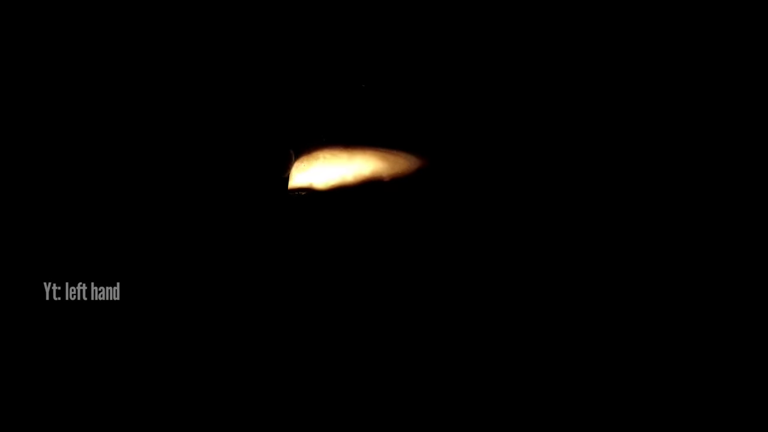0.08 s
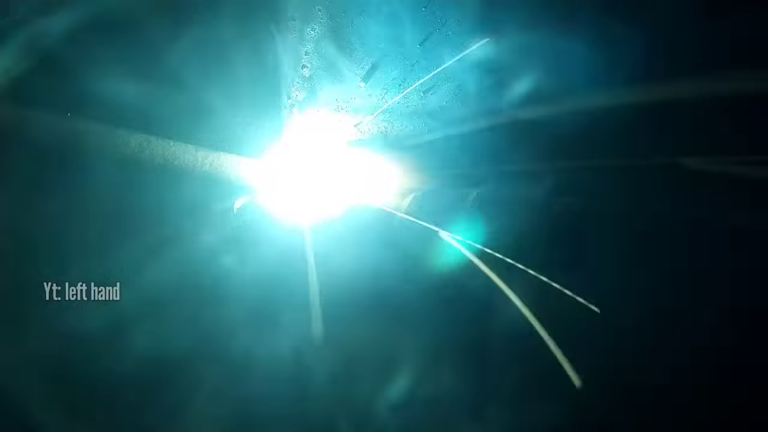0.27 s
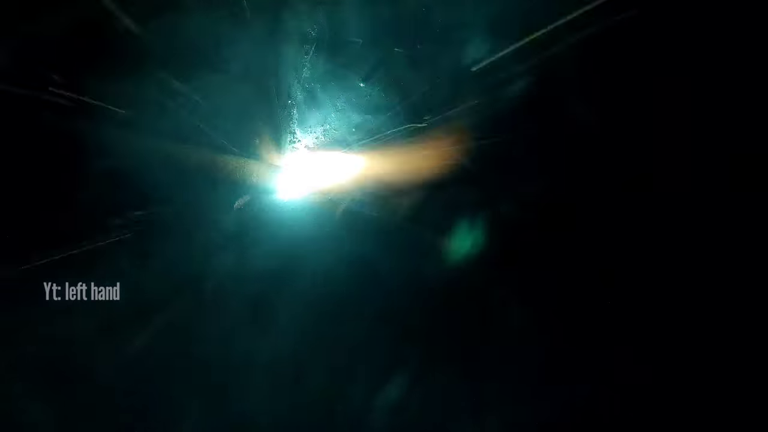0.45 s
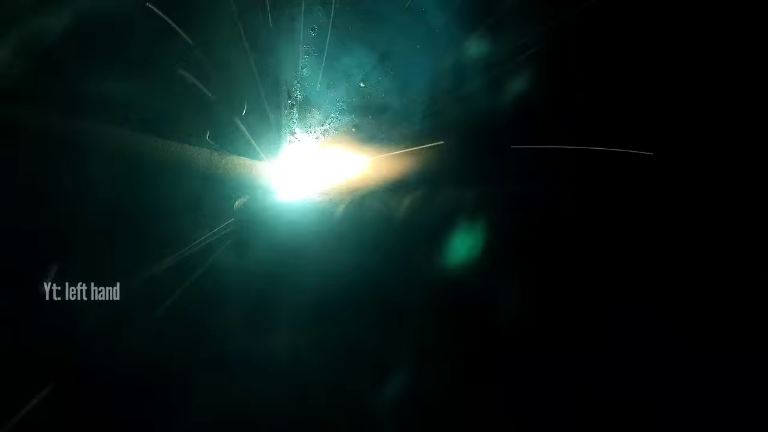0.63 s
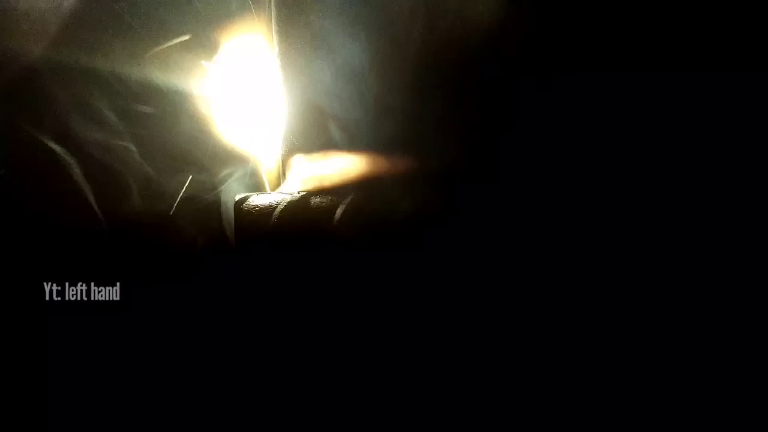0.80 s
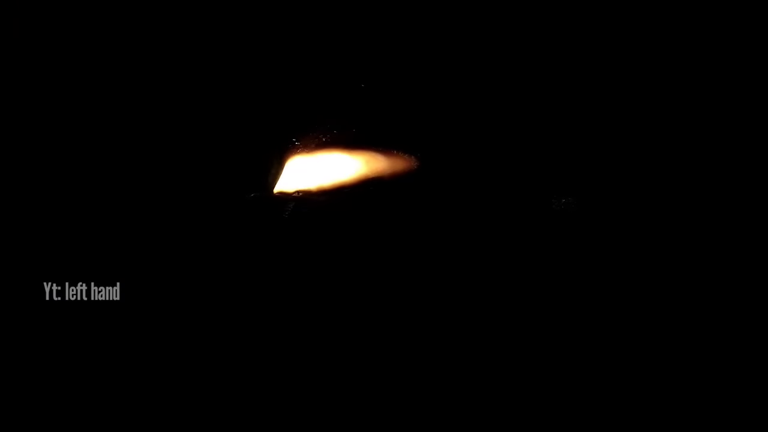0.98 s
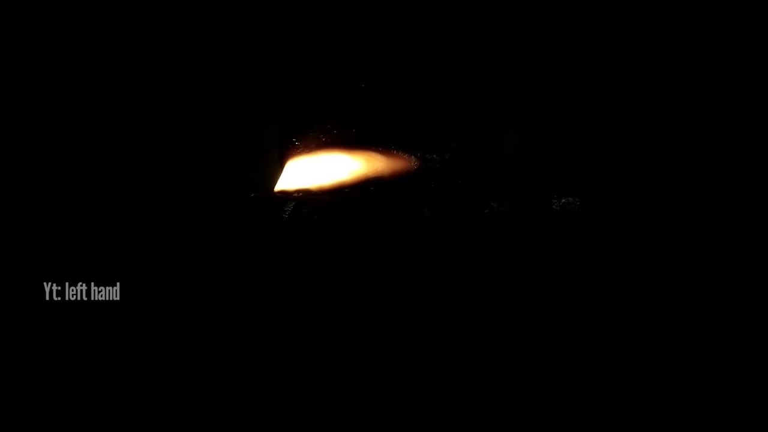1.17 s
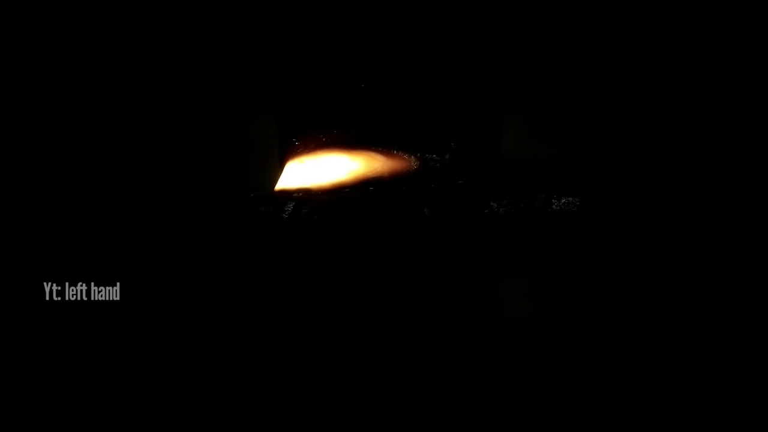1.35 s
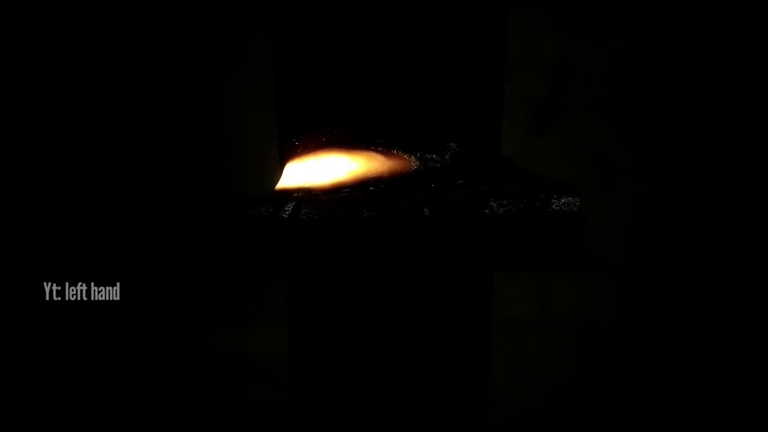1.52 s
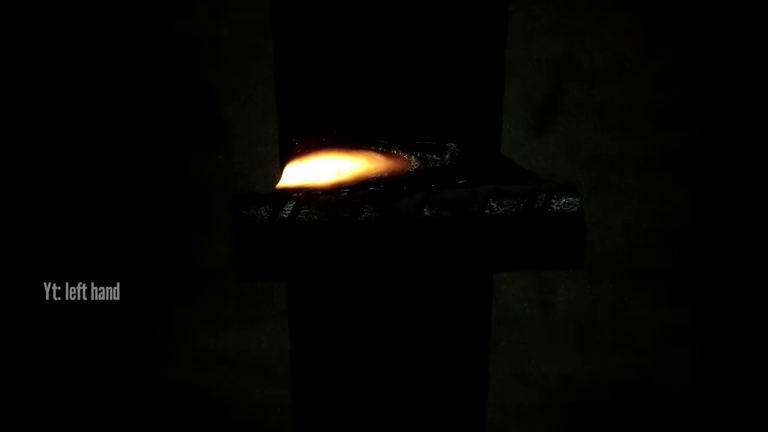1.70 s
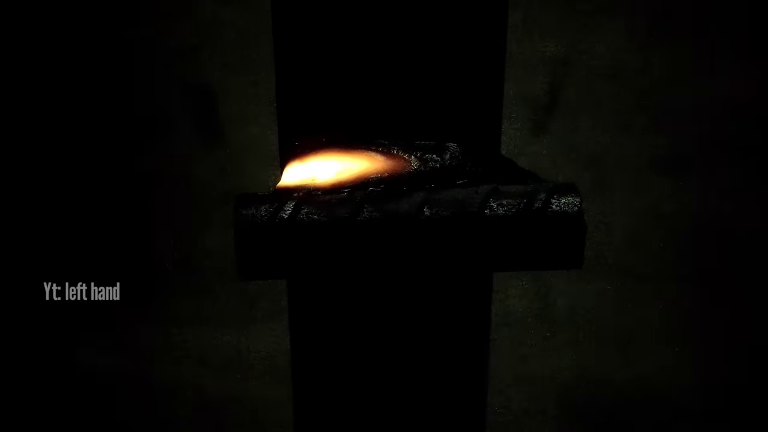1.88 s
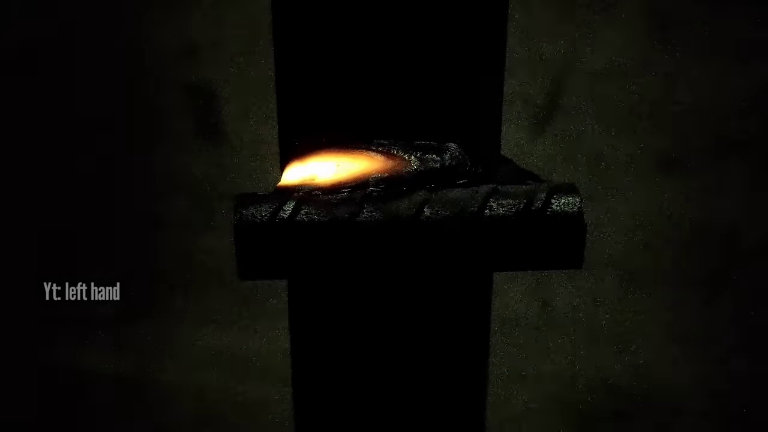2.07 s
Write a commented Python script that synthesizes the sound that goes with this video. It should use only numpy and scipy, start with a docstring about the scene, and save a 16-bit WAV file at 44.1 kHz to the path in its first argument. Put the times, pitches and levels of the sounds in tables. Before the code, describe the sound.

A welding arc strikes abruptly close to the microphones, sizzling and cracking sharply with low air thumps on the right, then cuts out into a brief soft hiss, a small hollow knock and faint ticks over workshop hum.

```python
"""From the start a transformer hum wavers (a drifting sine), a fan whines with its octave, and a far rumble
and room noise lie beneath (filtered noise). Then a welding arc strikes, sizzling, spitting and cracking for
two thirds of a second: noise bursts and spikes, brighter on the left, with pressure jolts and a flutter of air
thumping the right microphone, and a short workshop echo. As it goes out the hot weld hisses smoothly; later
come a puff with a metallic tick, a small hollow knock of decaying modes in rattling noise, and more ticks."""
import sys
import numpy as np
from scipy import signal
from scipy.fft import rfft, irfft
from scipy.io import wavfile
from scipy.ndimage import uniform_filter1d

SR = 44100
rng = np.random.default_rng(int(sys.argv[2]) if len(sys.argv) > 2 else 0)


def wav_record(signal):
    """Record a signal, one row per channel, as 16-bit PCM in the file named by sys.argv[1]."""
    frames = np.transpose(np.atleast_2d(signal))
    bounded = np.clip(frames, -1, 1)
    # unit amplitude maps onto the largest positive 16-bit level
    quanta = np.round(bounded * 32767).astype(np.int16)
    wavfile.write(sys.argv[1], SR, quanta)


def how_loud(loudness_db):
    """Turn decibels into a plain amplitude multiplier (0 dB gives 1, 20 dB gives 10)."""
    steps = np.asarray(loudness_db, float) / 20
    return 10 ** steps


N = 94815
t = np.arange(N) / SR

# Spectrum of the room noise. Each row: frequency in Hz, relative level in dB.
ROOM_COLOUR = [(40, -26), (70, -1), (130, -2.5), (250, -8), (400, -9), (470, -2), (750, -6.5), (880, -16),
               (1000, -17.5), (1200, -19), (2000, -15.5), (2800, -24.5), (4000, -27.5), (5500, -35.5),
               (7000, -30.5), (8500, -44), (16000, -56.5)]
# Level of the room noise. Each row: time in seconds, level in dB.
ROOM_LEVEL = [(0, -47.5), (.23, -50), (.9, -51), (1.0, -45), (1.1, -48.5), (1.4, -51), (1.55, -51),
              (1.8, -50), (2.15, -50)]
# Wavering level of the transformer hum. Each row: time in seconds, rms level in dB.
HUM_LEVEL = [(0.0, -59.5), (0.15, -54), (0.27, -56), (0.62, -67), (0.77, -74), (0.9, -49.5), (0.99, -76),
             (1.17, -57), (1.51, -61), (1.64, -48.5), (1.71, -46.5), (1.86, -63), (2.15, -75)]
# Level of the far rumble. Each row: time in seconds, level in dB.
RUMBLE_LEVEL = [(0, -69.5), (1.6, -83), (1.8, -63.5), (2.1, -61.5), (2.125, -66), (2.14, -44), (2.15, -59)]
# Spectrum of the rumble. Each row: frequency in Hz, relative level in dB.
RUMBLE_COLOUR = [(25, -44.5), (45, 20.5), (75, 5), (150, 6), (300, -31.5)]
# Level of the arc's sizzle before each microphone's colour. Each row: time in seconds, level in dB.
SIZZLE_LEVEL = [(.238, -87), (.241, -32.5), (.29, -32.5), (.305, -37.5), (.312, -35), (.33, -30),
                (.338, -46), (.342, -38), (.39, -43.5), (.402, -40.5), (.43, -32.5), (.445, -44),
                (.456, -29), (.505, -44.5), (.511, -27), (.56, -31.5), (.585, -30.5), (.592, -29.5),
                (.635, -24.5), (.665, -33.5), (.674, -24.5), (.677, -46), (.685, -33.5), (.72, -33.5),
                (.735, -27.5), (.76, -36.5), (.785, -36), (.825, -36), (.83, -28), (.852, -25),
                (.862, -32.5), (.897, -43.5), (.901, -34), (.906, -28.5), (.911, -37), (.918, -31),
                (.926, -53), (.97, -74.5)]
# Colour of the arc at the left microphone. Each row: frequency in Hz, relative level in dB.
ARC_LEFT_COLOUR = [(100, -31), (500, -12.5), (1500, -11.5), (3300, -5), (5600, -9), (6700, -3), (8300, -7),
                   (8900, -5), (11800, -4.5), (14000, 0.5), (15200, -5.5), (16200, 1)]
# Colour of the arc at the right microphone. Each row: frequency in Hz, relative level in dB.
ARC_RIGHT_COLOUR = [(100, -19), (500, -20), (2000, -12), (2900, -7), (4200, -12), (5600, -11), (6500, -2.5),
                    (8300, -15.5), (8900, -5.5), (11900, -28), (14700, -3), (16200, -27)]
# Loud cracks of the arc. Each row: time at the left microphone in seconds, reference level in dB,
# lean to the left in dB.
CRACKS = [(.2602, -22, 5), (.3146, -16, 4), (.3193, -18, 3), (.3238, -10, 7), (.3345, -11, 8),
          (.3522, -24, 2), (.3813, -21, 4), (.3823, -13, 5), (.41, -22, 6), (.4549, -9, 2), (.5088, -21, 2),
          (.5139, -10, 6), (.5326, -16, 13), (.5462, -12, 13), (.5615, -16, 11), (.5722, -16, 8),
          (.5941, -14, 2), (.5995, -9, 2), (.6099, -18, 7), (.6267, -16, 9), (.63, -18, 3), (.6339, -11, 3),
          (.6366, -11, 4), (.6382, -12, 4), (.6475, -16, 7), (.6642, -13, 8), (.6648, -3, 11),
          (.6658, -12, 8), (.6842, -5, 9), (.73, -15, 3), (.7391, -19, 3), (.7439, -10, 6), (.7528, -13, 6),
          (.8296, -8, 12), (.8344, -18, 9), (.8405, -9, 16), (.8474, -15, 12), (.849, -1.5, 15),
          (.8535, -17, 18), (.9006, -21, 4), (.9053, -25, 2), (.9168, -26, 2)]
# Late puffs of the cooling weld. Each row: start in seconds, level in dB, decay in seconds.
PUFFS = [(1.2945, -40.5, 0.019)]
# Level of the low flutter of air. Each row: time in seconds, level in dB.
FLUTTER_LEVEL = [(.238, -65), (.245, -28), (.295, -28.5), (.31, -42), (.35, -31), (.39, -52), (.4, -67),
                 (.5, -63), (.515, -43), (.55, -61), (.58, -54), (.6, -37), (.63, -52), (.69, -37.5),
                 (.72, -42.5), (.77, -38), (.82, -44), (.87, -46), (.9, -35), (.92, -42.5), (.93, -70)]
# Spectrum of the flutter. Each row: frequency in Hz, relative level in dB.
FLUTTER_COLOUR = [(50, -37.5), (90, 6.5), (250, -3.5), (600, -14.5), (1500, -18.5), (5000, -43.5)]
# Pressure jolts on the right microphone. Each row: start in seconds, level in dB, sign of the push.
RIGHT_JOLTS = [(.2393, -17, -1), (.2417, -18, 1), (.2434, -18, 1), (.2463, -14, -1), (.2625, -14, -1),
               (.2631, -14, 1), (.3239, -7, -1), (.3245, -6.5, 1), (.3343, -8, -1), (.3348, -7.5, 1),
               (.3524, -19, -1), (.3529, -16, 1), (.3536, -19, -1), (.3811, -6, -1), (.3816, -17, 1),
               (.38215, -10, 1), (.3823, -8, -1), (.3826, -8, 1), (.4548, -12, 1), (.594, -10, 1),
               (.603, -24, -1), (.6646, -13, 1), (.6739, -20, -1), (.6839, -10, 1), (.7437, -7, 1),
               (.7525, -7, -1), (.8011, -22, 1), (.8488, -6, 1), (.8554, -24, -1)]
# The one jolt that lands on the left. The row: start in seconds, level in dB, sign of the push.
LEFT_JOLT = (.3522, -16, -1)
# Level of the hot weld's smooth hiss. Each row: time in seconds, level in dB.
AFTER_HISS_LEVEL = [(.915, -68), (.93, -51.5), (.97, -54.5), (1.0, -51.5), (1.06, -54.5), (1.12, -57.5),
                    (1.14, -72), (1.25, -81)]
# Spectrum of that hiss. Each row: frequency in Hz, relative level in dB.
AFTER_HISS_COLOUR = [(1000, -24), (3000, -1), (7000, -1), (9500, -10.5), (12500, -5.5), (14500, -0.5),
                     (16000, -3.5)]
# Small metallic ticks. Each row: start in seconds, level in dB, decay in seconds, two ring pitches in Hz.
TICKS = [(1.2945, -57, .012, 4900, 6500), (1.661, -60, 0.012, 2300, 3300), (2.009, -53, 0.006, 2350, 3400),
         (2.1245, -58, 0.004, 7250, 10400), (2.1365, -49, 0.006, 2500, 3450)]
# Spectrum of the ticks' noise. Each row: frequency in Hz, relative level in dB.
TICK_COLOUR = [(300, -25), (2000, -4), (3500, 0), (5500, -7), (7000, -4), (8500, -14), (11000, -11),
               (16000, -24)]
# Level of the knock's rattling body. Each row: time in seconds, level in dB.
RATTLE_LEVEL = [(1.654, -90), (1.659, -42), (1.674, -41), (1.7, -50), (1.73, -51.5), (1.78, -68.5),
                (1.8, -100)]
# Spectrum of the rattle. Each row: frequency in Hz, relative level in dB.
RATTLE_COLOUR = [(300, -30), (600, -0.5), (800, -0.5), (1100, -2), (1500, -6.5), (2200, -21.5),
                 (4000, -23.5), (9000, -38.5)]
# Blows of the small knock. Each row: start in seconds, level in dB.
KNOCKS = [(1.662, -38), (1.672, -28.5), (1.684, -40)]
# Modes of the knocked object. Each row: frequency in Hz, level against the blow in dB, T60 in seconds.
KNOCK_MODES = [(622, -14.5, 0.13), (773, 0.5, 0.06), (820, -9, 0.047), (1090, -7.5, 0.016),
               (1380, -18, 0.09), (1690, -25, 0.042), (2290, -22.5, 0.047), (3330, -41, 0.074)]

HUM_HZ, HUM_WOBBLE = 100.7, 0.027  # wobble as a fraction of the pitch
WHINE_HZ, WHINE_WIDTH_HZ = 485, 2.5
WHINE_DB, WHINE_OCTAVE_DB, WHINE_FLICKER_DB = -56.5, -14, 1.2
WHINE_PAN_DB = 8  # left over right; the octave leans the other way
LEFT_LAG_S = 0.00015  # the arc reaches the left microphone later
ARC_RIGHT_DB = -6.5
SHARED = .5  # power share of the arc noise common to both microphones
SPUTTER_DB = 2.5  # quick unevenness of the sizzle
SPITS_PER_S, SPIT_S = 450, .00025
SPIT_DB, SPIT_SPREAD_DB, SPIT_TOP_DB = 4, 6, 16  # against the steady sizzle
CRACK_S, CRACK_TAIL_S = .00002, .0011  # decay of the spike and of its hissing tail
SPIKE_DB, TAIL_DB = 8, -14  # against the crack's reference level
RING_HZ, RING_S, RING_DB = 13900, .00028, -1
RING_FULL_DB = 12  # left lean at which a crack's ring is full
ECHO_T60_S, ECHO_DB, ECHO_GAP_S, ECHO_TOP_HZ = 0.22, -18, 0.0013, 8500
JOLT_RISE_S, JOLT_LEAK_DB = .000045, -27
MIC_CUT_HZ, MIC_CUT_DAMP = 99, 2.94
AFTER_RIGHT_DB = 1.5  # right over left
KNOCK_PUSH_S = 0.0012  # softness of the blow


def curve(rows):
    """Gain over time from (s, dB) rows."""
    return how_loud(np.interp(t, *np.array(rows, float).T))


def unit(x):
    """Scale to rms 1."""
    return x / np.sqrt(np.mean(x ** 2))


def colour(x, rows):
    """Minimum-phase filter shaped by (Hz, dB) rows; white noise keeps its level."""
    size = 4096
    hz, db = np.array(rows, float).T
    bins_hz = np.arange(size // 2 + 1) * SR / size
    gain_db = np.interp(np.log(bins_hz + 1), np.log(hz), db)
    # folding the cepstrum forward in time makes the filter causal
    cepstrum = irfft(np.log(how_loud(gain_db)))
    cepstrum[1:size // 2] *= 2
    cepstrum[size // 2 + 1:] = 0
    impulse = irfft(np.exp(rfft(cepstrum)))
    return signal.fftconvolve(x, impulse / np.sqrt(np.sum(impulse ** 2)))[:N]


def fade(times, sizes, decay_s):
    """Jumps at the given times that die away exponentially."""
    x = np.zeros(N)
    np.add.at(x, np.clip((np.asarray(times) * SR).astype(int), 0, N - 1), sizes)
    return signal.lfilter([1], [1, -np.exp(-1 / (decay_s * SR))], x)


def walk(rate):
    """Slow random drift of rms 1, with fresh targets at the given rate in Hz."""
    hold = int(SR / rate)
    steps = np.repeat(rng.standard_normal(N // hold + 1), hold)
    smooth = uniform_filter1d(uniform_filter1d(steps, hold), hold)
    return unit(smooth[:N])


def room():
    """Room noise, alike left and right in the bass because the side signal is high-passed."""
    mid, side = (colour(rng.standard_normal(N), ROOM_COLOUR) for _ in range(2))
    side = signal.lfilter(*signal.butter(2, 296, "high", fs=SR), side)
    return curve(ROOM_LEVEL) * np.array([mid + side, mid - side]) / np.sqrt(2)


def transformer_hum():
    """One sine whose pitch drifts at random and whose level wavers."""
    pitch_hz = HUM_HZ * (1 + HUM_WOBBLE * walk(8.4))
    return np.sqrt(2) * curve(HUM_LEVEL) * np.sin(2 * np.pi * np.cumsum(pitch_hz) / SR)


def fan_whine():
    """A thin sine and its octave, slightly unsteady in pitch and level, leaning to opposite sides."""
    phase = 2 * np.pi * np.cumsum(WHINE_HZ + WHINE_WIDTH_HZ / 2 * walk(14)) / SR
    pan = how_loud(np.array([[1], [-1]]) * WHINE_PAN_DB / 2)
    tone = pan * np.sin(phase) + how_loud(WHINE_OCTAVE_DB) * np.sin(2 * phase) / pan
    return tone * how_loud(WHINE_DB + WHINE_FLICKER_DB * walk(31.0))


def rumble():
    """Far low noise, the same on both sides."""
    return curve(RUMBLE_LEVEL) * colour(rng.standard_normal(N), RUMBLE_COLOUR)


def sputtering_sizzle():
    """Envelope of the burning arc: an uneven level covered with small random spits."""
    gap, size = rng.exponential(size=(4000, 2)).T
    when = np.cumsum(gap) / SPITS_PER_S
    spit_db = np.minimum(SPIT_DB + SPIT_SPREAD_DB * (size - 1), SPIT_TOP_DB)
    spits = 1 + fade(when, how_loud(spit_db) * (when < N / SR), SPIT_S)
    return curve(SIZZLE_LEVEL) * unit(spits * how_loud(SPUTTER_DB * walk(150)))


def arc():
    """Partly shared noise under sizzle, crack tails and puffs, plus spikes; left-leaning cracks ring."""
    body = sputtering_sizzle() + sum(fade([s], how_loud(db), decay) for s, db, decay in PUFFS)
    at, db, pan_db = np.array(CRACKS).T
    at = at - LEFT_LAG_S
    sign = np.sign(rng.standard_normal(len(at)))
    lean = np.clip(pan_db / RING_FULL_DB, 0, 1)
    kicks = fade(at, sign * how_loud(db + RING_DB) * lean, CRACK_S)
    pole = np.exp(2j * np.pi * RING_HZ / SR - 1 / (RING_S * SR))
    ring = signal.lfilter([1], [1, -pole], kicks).real
    common = rng.standard_normal(N)
    ears = []
    for rows, lower_db in ((ARC_LEFT_COLOUR, 0 * pan_db), (ARC_RIGHT_COLOUR, pan_db - 6.0)):
        noise = np.sqrt(SHARED) * common + np.sqrt(1 - SHARED) * rng.standard_normal(N)
        peak = how_loud(db - lower_db)
        tails = fade(at, peak * how_loud(TAIL_DB), CRACK_TAIL_S)
        # a ringing crack has a weaker spike
        spikes = fade(at, sign * peak * how_loud(SPIKE_DB) * (1 - lean / 2), CRACK_S)
        ears.append(colour(noise * (body + tails) + spikes, rows))
    left = np.roll(ears[0] + ring, round(LEFT_LAG_S * SR))
    return np.array([left, how_loud(ARC_RIGHT_DB) * ears[1]])


def workshop_echo(x):
    """Adds a decaying, dulled cloud of random echoes to each channel."""
    age = t[:SR] - ECHO_GAP_S
    tail = rng.standard_normal((2, SR)) * (age > 0) * np.exp(-np.log(1000) * age / ECHO_T60_S)
    tail = signal.lfilter(*signal.butter(1, ECHO_TOP_HZ, fs=SR), tail)
    tail = tail / np.sqrt(np.sum(tail ** 2) / 2)
    return x + how_loud(ECHO_DB) * signal.fftconvolve(x, tail, axes=1)[:, :N]


def flutter():
    """Rough low noise of air on the microphone, its level trembling at random."""
    return curve(FLUTTER_LEVEL) * how_loud(2.0 * walk(60.53)) * colour(rng.standard_normal(N), FLUTTER_COLOUR)


def pressure_steps(rows):
    """Quick steps of pressure that the microphone's bass cut lets go again."""
    at, db, sign = np.array(rows).T
    pushes = fade(at, how_loud(db) * np.sign(sign), JOLT_RISE_S)
    steps = np.cumsum(pushes) / (JOLT_RISE_S * SR)
    w = 2 * np.pi * MIC_CUT_HZ
    bass_cut = signal.bilinear([1, 0, 0], [1, MIC_CUT_DAMP * w, w * w], SR)
    return signal.lfilter(*bass_cut, steps)


def air_thumps():
    """Jolts and flutter strike the right microphone and leak faintly left, where one jolt lands too."""
    right = pressure_steps(RIGHT_JOLTS) + flutter()
    left = pressure_steps([LEFT_JOLT]) + how_loud(JOLT_LEAK_DB) * right
    return np.array([left, right])


def after_hiss():
    """Smooth uneven hiss of the hot weld, unrelated left and right."""
    hiss = [colour(rng.standard_normal(N), AFTER_HISS_COLOUR) * how_loud(1.7 * walk(46)) for _ in range(2)]
    return curve(AFTER_HISS_LEVEL) * np.array(hiss) * how_loud(np.array([[-1], [1]]) * AFTER_RIGHT_DB / 2)


def ticks():
    """Short noisy ticks on metal, each with two brief rings."""
    out = np.zeros((2, N))
    for s, db, decay, *ring_hz in TICKS:
        shape = fade([s], how_loud(db), decay)
        out += [colour(shape * rng.standard_normal(N), TICK_COLOUR) for _ in range(2)]
        for hz in ring_hz:
            out += shape * np.sin(2 * np.pi * (hz * t + rng.random()))
    return out


def rattle():
    """Dense noise that fills the knock, unrelated left and right."""
    return np.array([colour(curve(RATTLE_LEVEL) * rng.standard_normal(N), RATTLE_COLOUR) for _ in range(2)])


def knock():
    """Soft blows ring the modes of a small hollow object, with other strengths left and right."""
    out = np.zeros((2, N))
    for s, db in KNOCKS:
        age = np.clip(t - s, 0, None)
        push = 1 - np.exp(-age / KNOCK_PUSH_S)
        for hz, mode_db, t60 in KNOCK_MODES:
            ring = push * np.exp(-np.log(1000) * age / t60) * np.sin(2 * np.pi * hz * age)
            out += how_loud(db + mode_db + 1.5 * rng.standard_normal((2, 1))) * ring
    return out


def scene():
    """All sources at the two microphones; arc, knock, rattle and ticks also echo in the workshop."""
    echoing = workshop_echo(arc() + knock() + rattle() + ticks())
    weld = echoing + after_hiss() + air_thumps()
    machines = transformer_hum() + fan_whine() + rumble()
    return weld + machines + room()


def band_limit(x):
    """A steep low-pass at the top of the band."""
    return signal.sosfilt(signal.butter(12, 17000, fs=SR, output="sos"), x)


def record(dry):
    """Cuts the extreme top steeply and the deep bass gently."""
    top_cut = signal.ellip(8, .2, 70, 16100, fs=SR, output="sos")
    bass_cut = signal.butter(2, 66.4, "high", fs=SR, output="sos")
    mix = signal.sosfilt(np.vstack([top_cut, bass_cut]), dry)
    return band_limit(mix)


dry = scene()
out = record(dry)
wav_record(out)
```